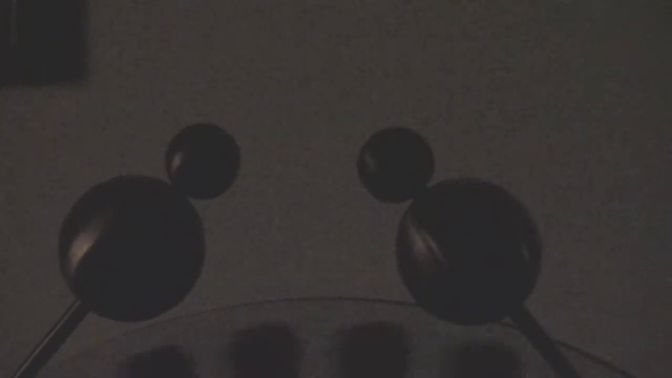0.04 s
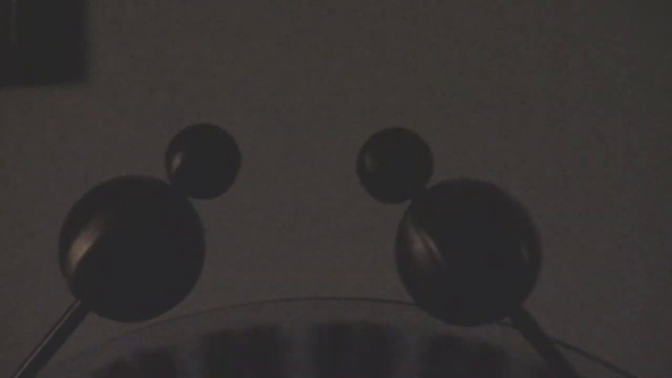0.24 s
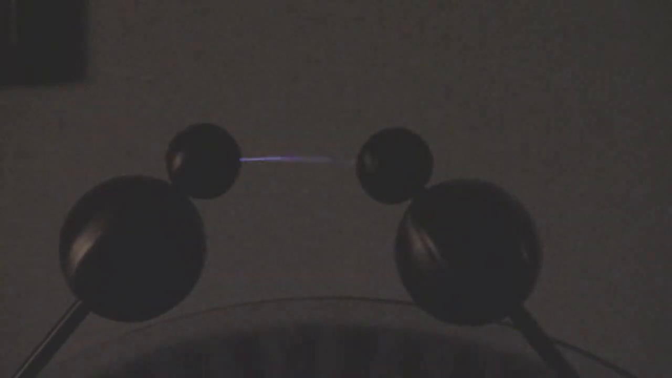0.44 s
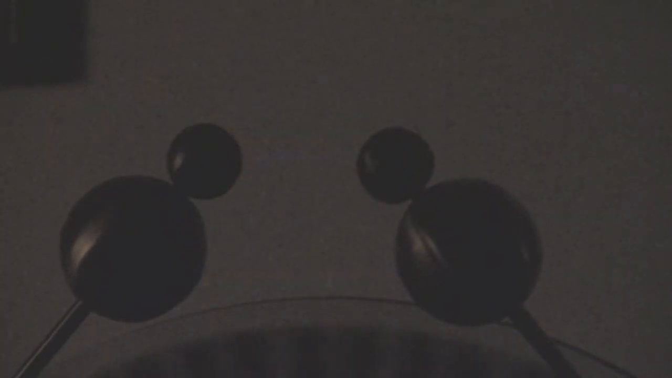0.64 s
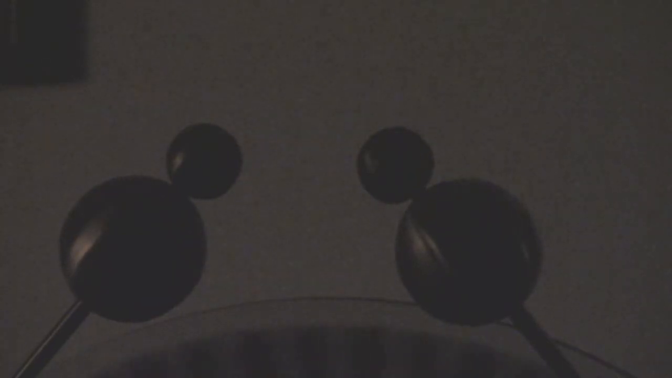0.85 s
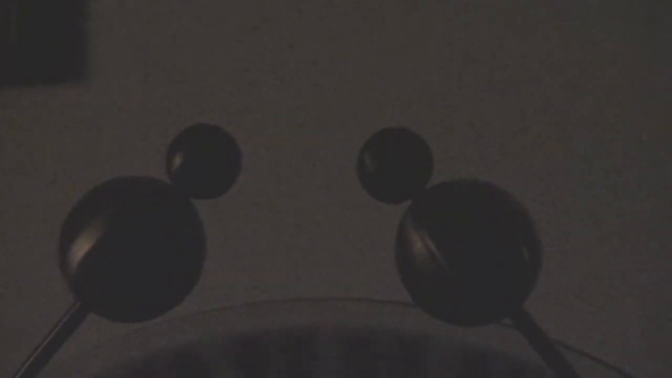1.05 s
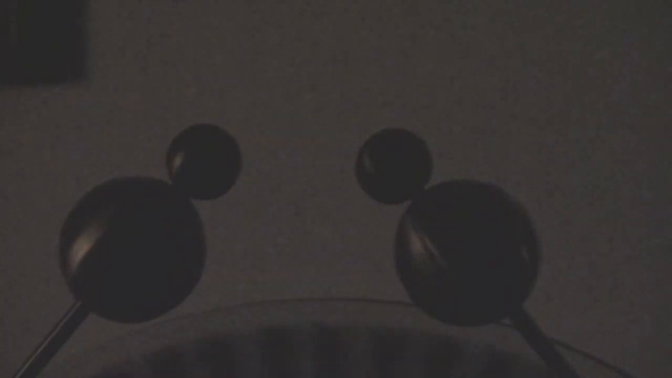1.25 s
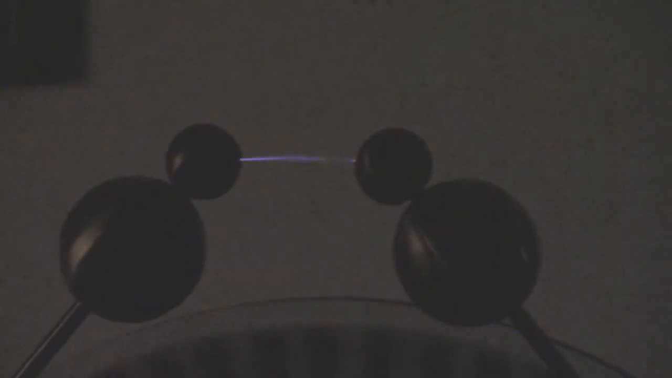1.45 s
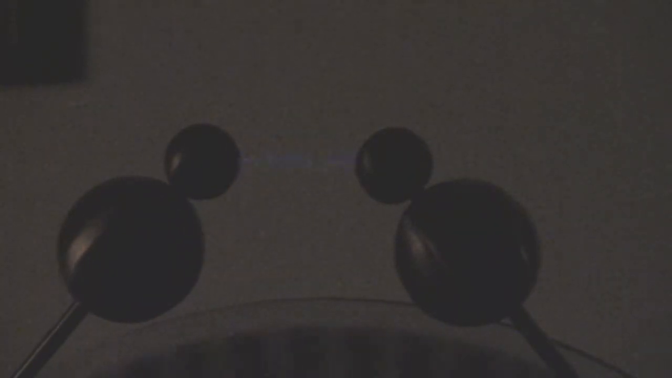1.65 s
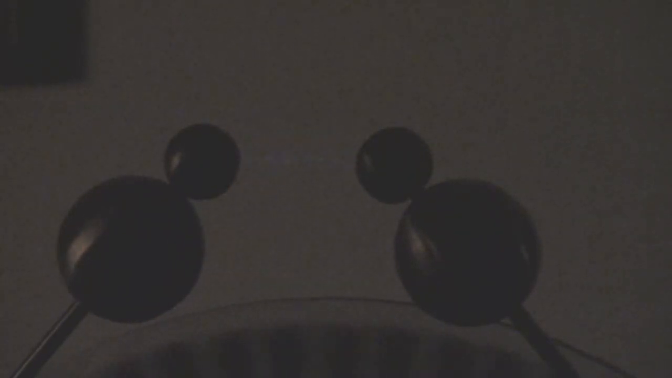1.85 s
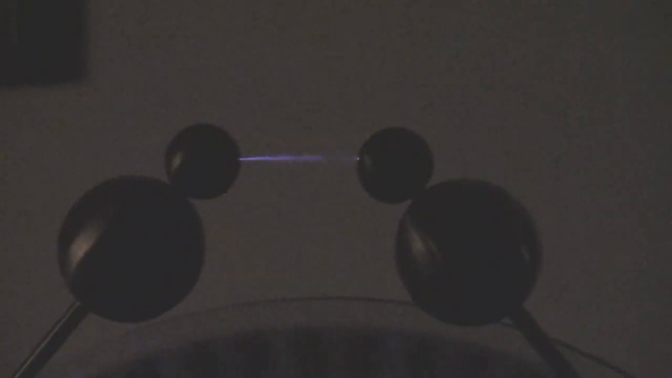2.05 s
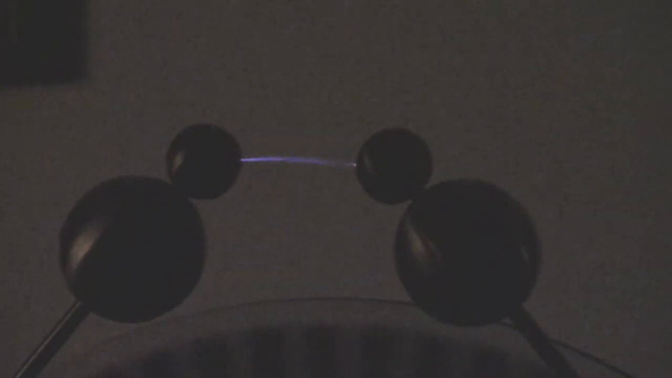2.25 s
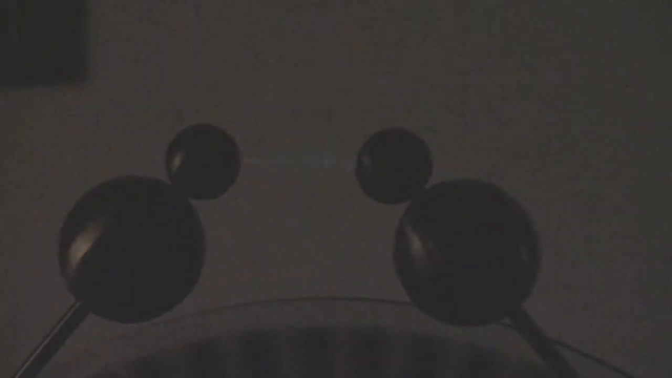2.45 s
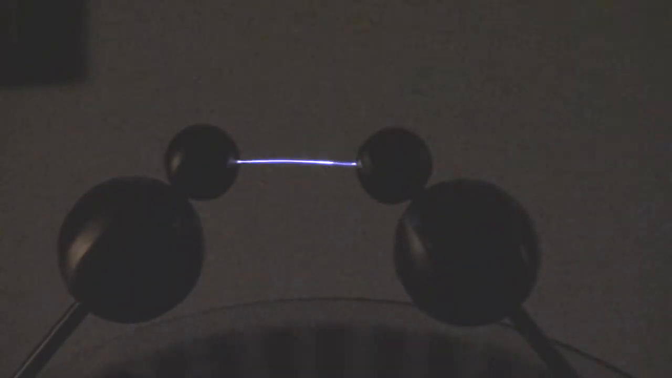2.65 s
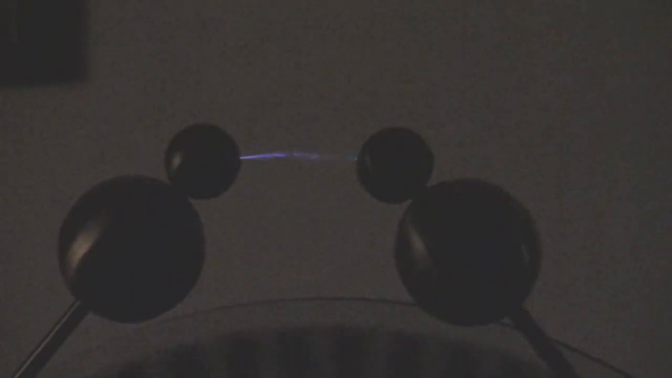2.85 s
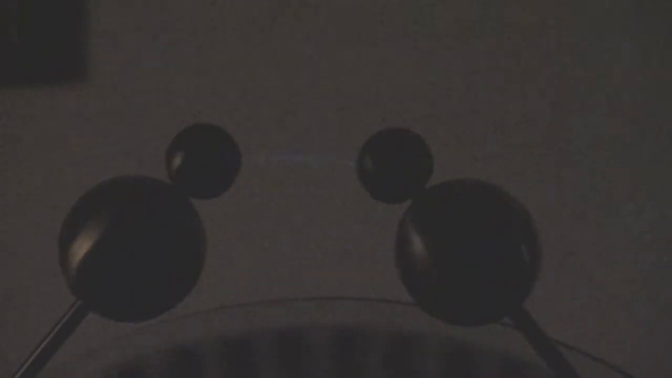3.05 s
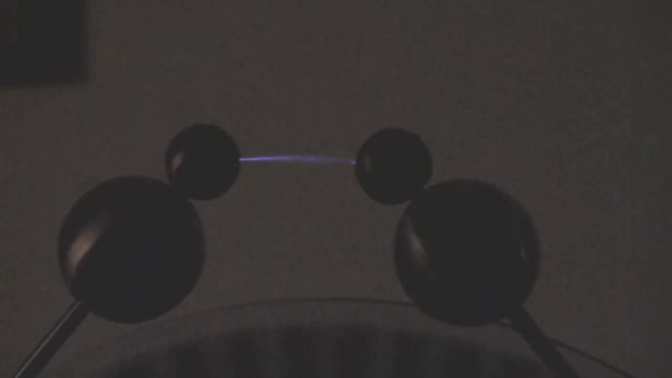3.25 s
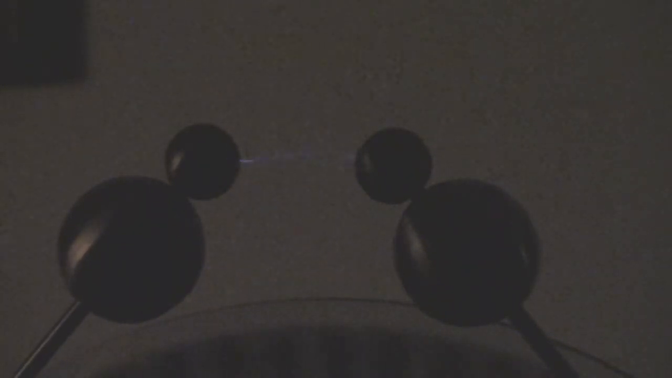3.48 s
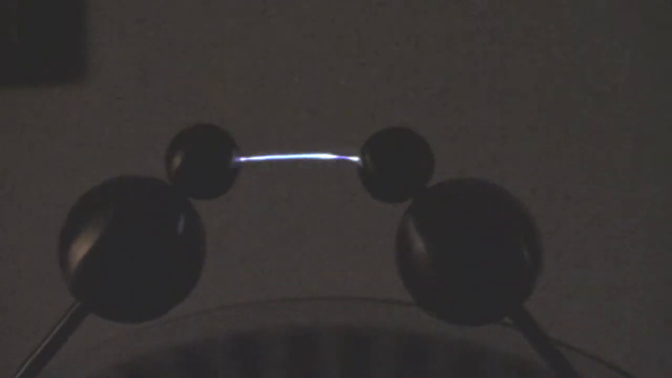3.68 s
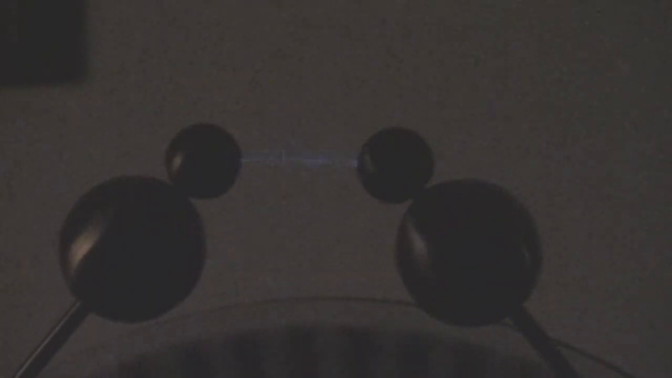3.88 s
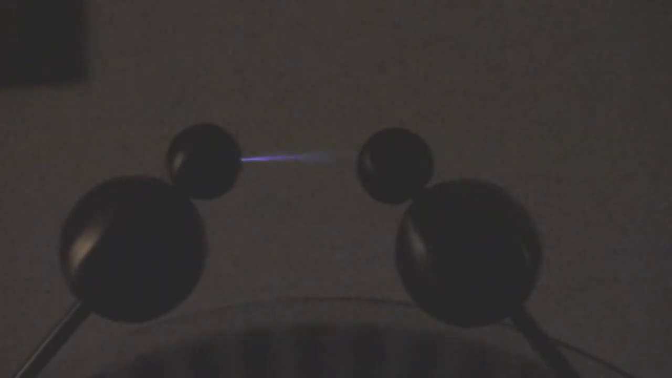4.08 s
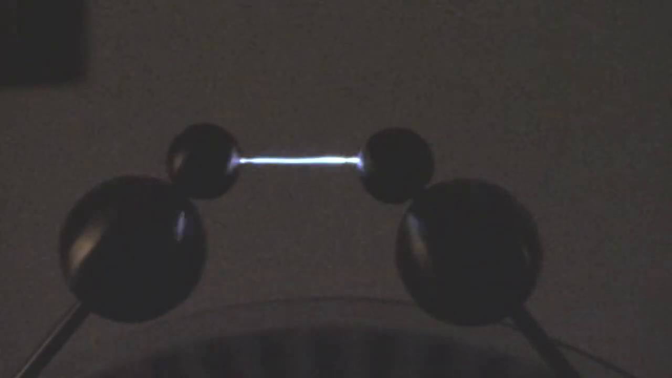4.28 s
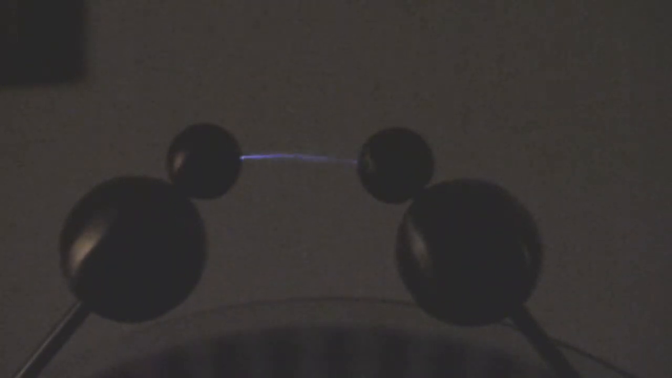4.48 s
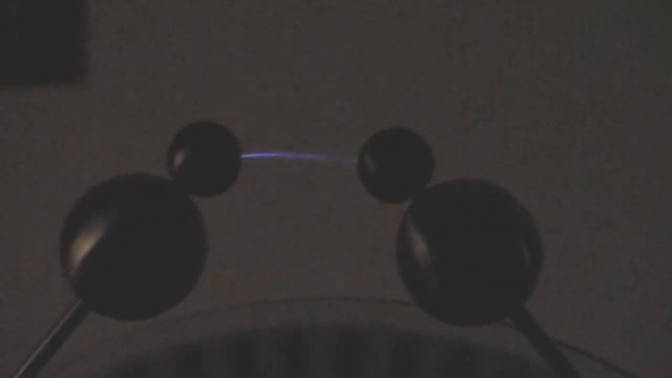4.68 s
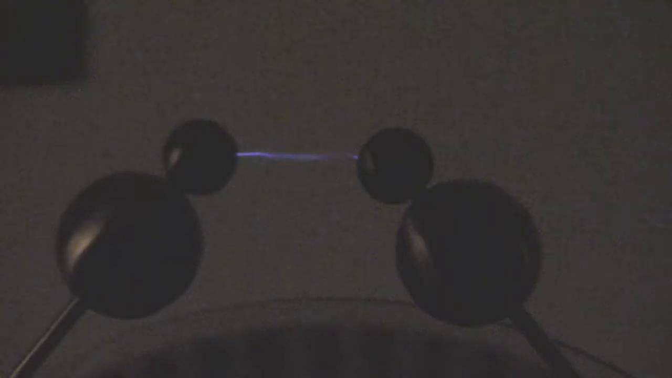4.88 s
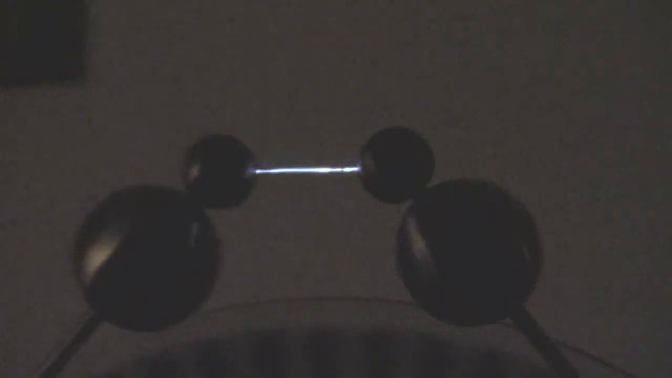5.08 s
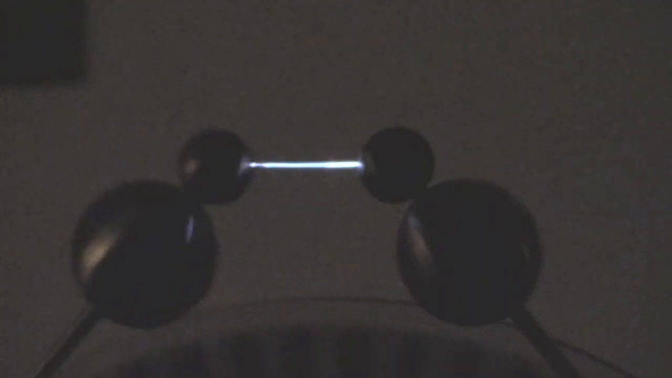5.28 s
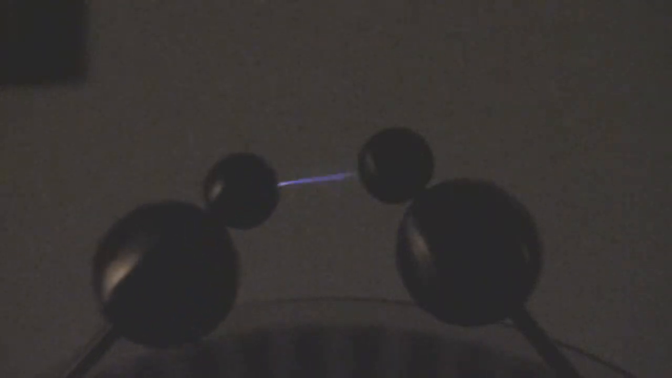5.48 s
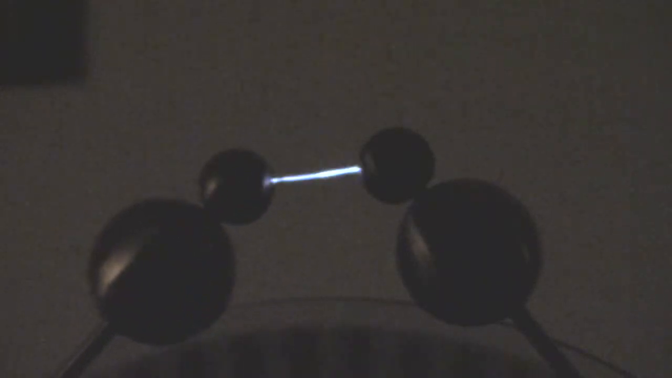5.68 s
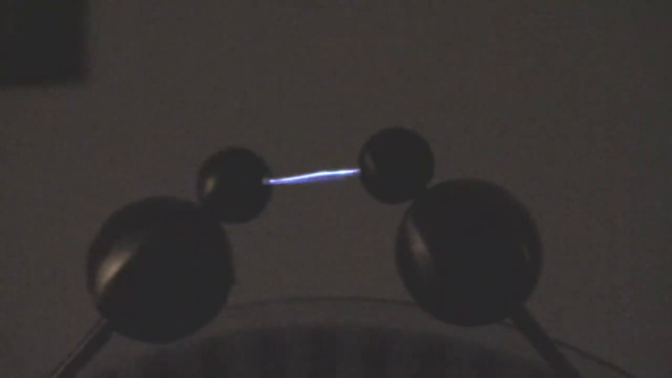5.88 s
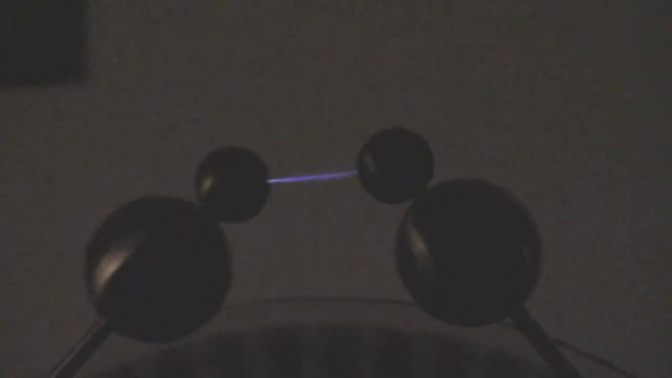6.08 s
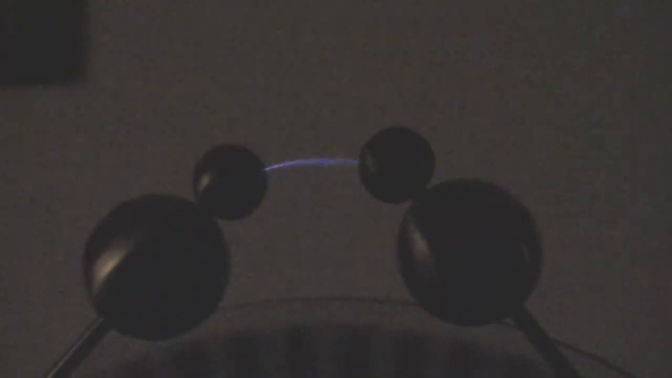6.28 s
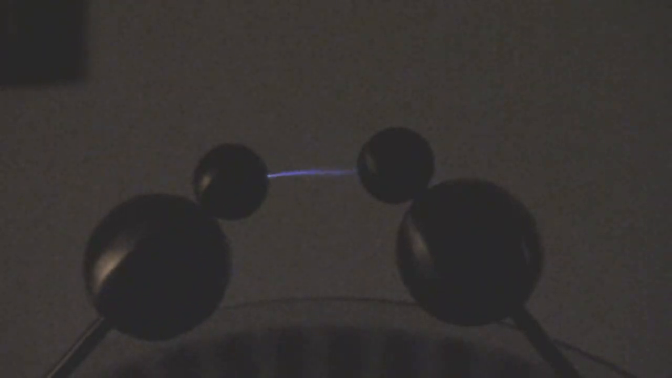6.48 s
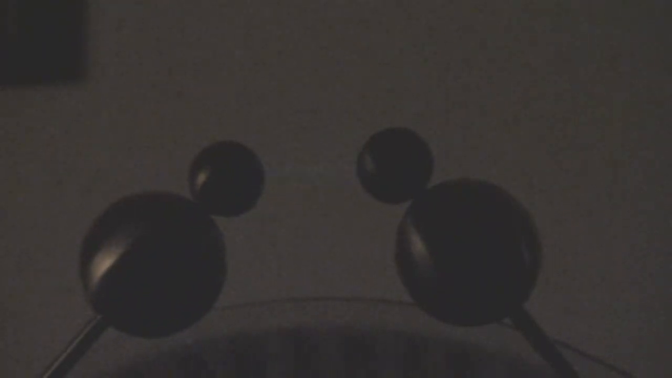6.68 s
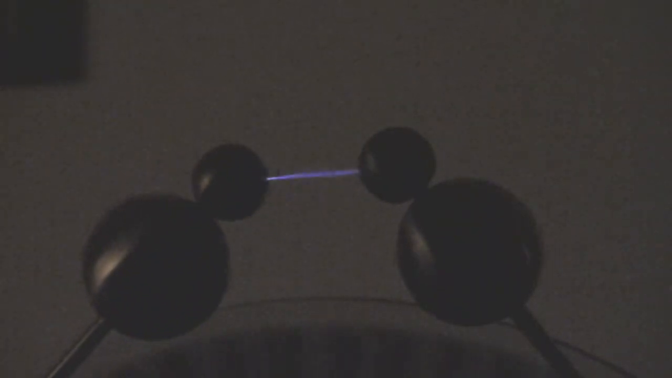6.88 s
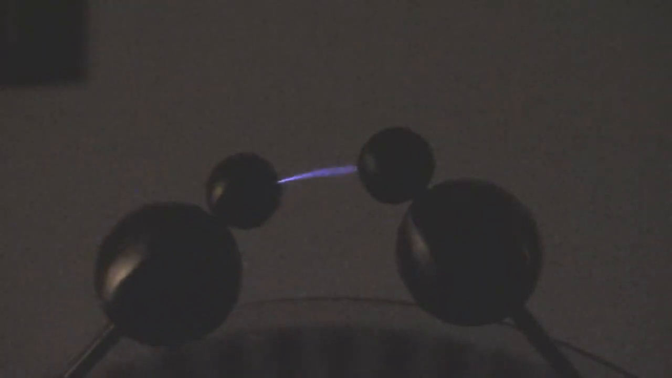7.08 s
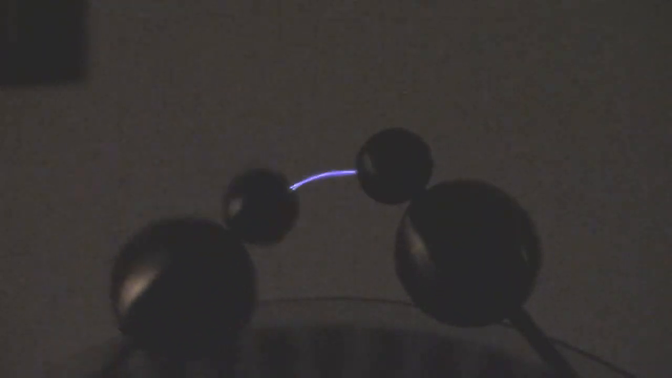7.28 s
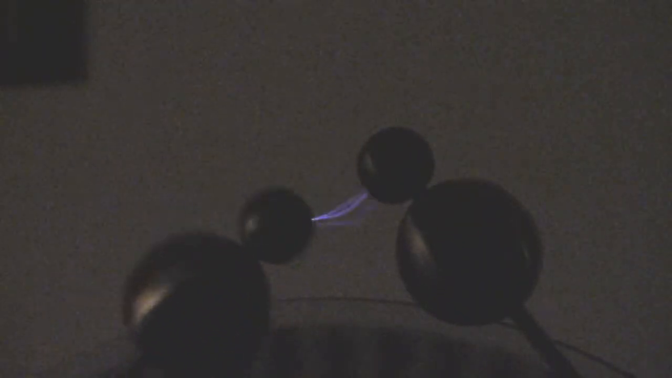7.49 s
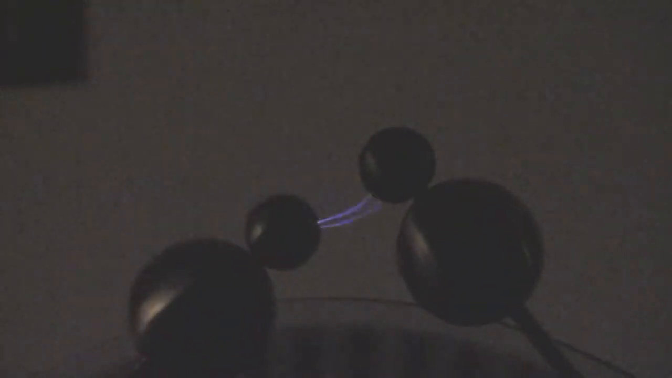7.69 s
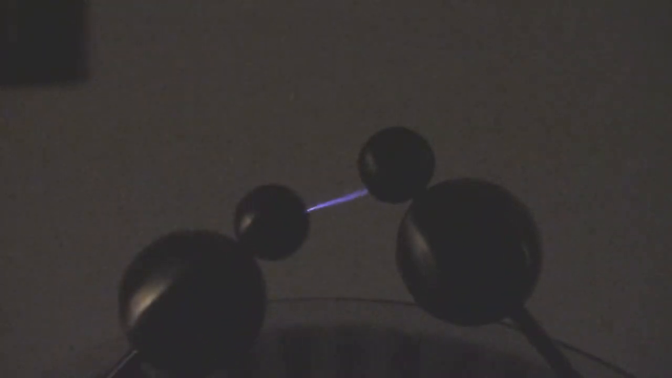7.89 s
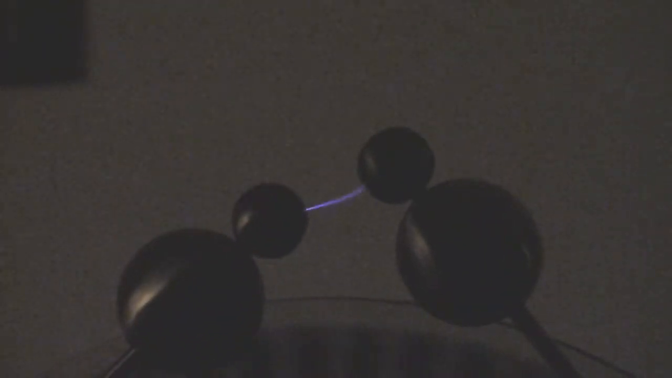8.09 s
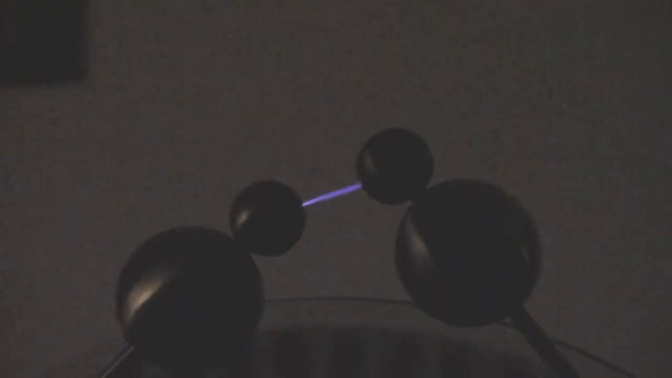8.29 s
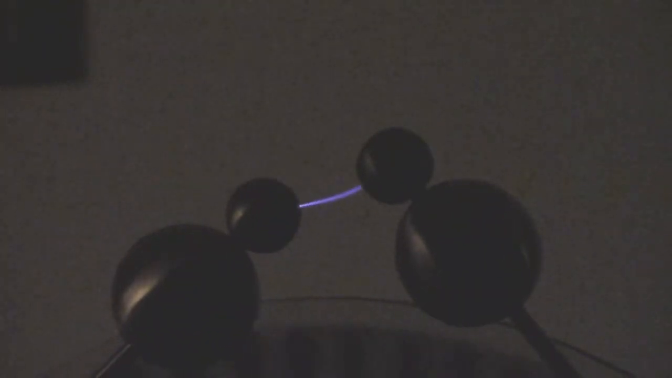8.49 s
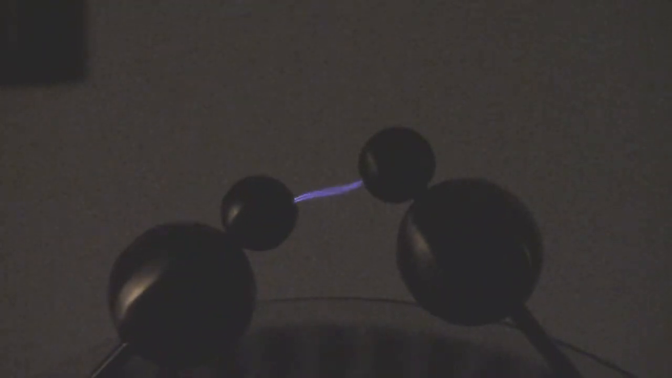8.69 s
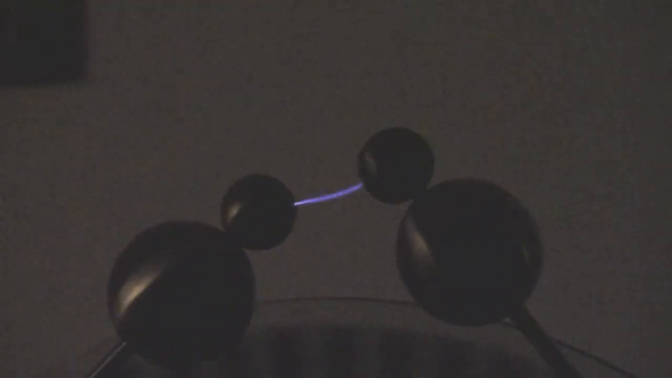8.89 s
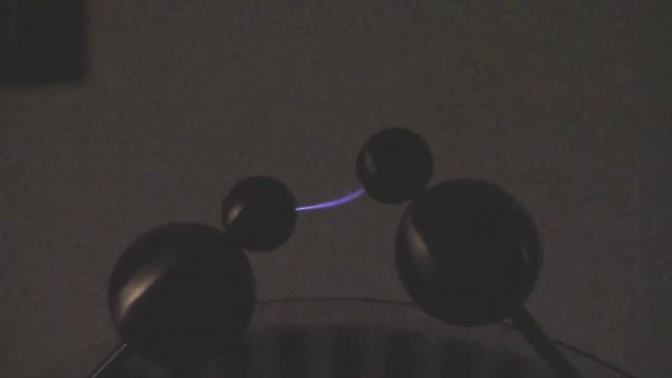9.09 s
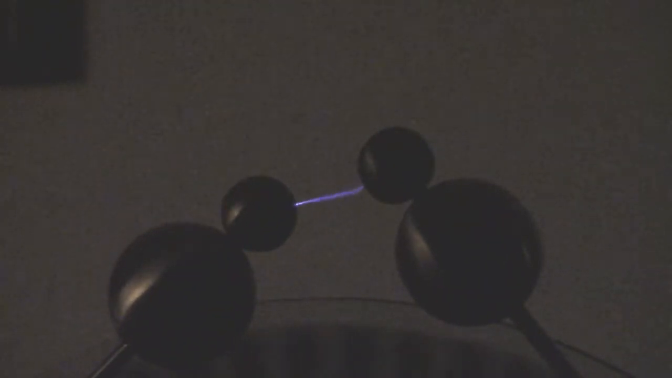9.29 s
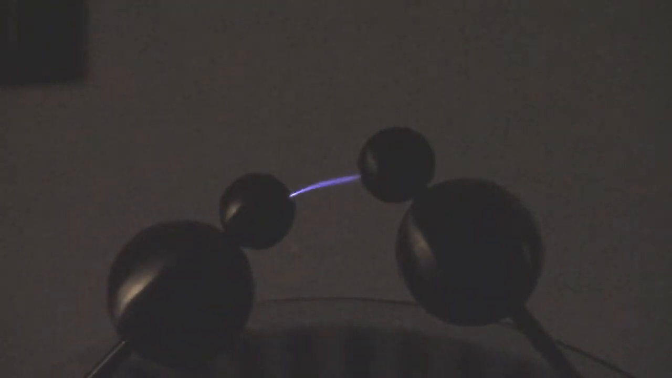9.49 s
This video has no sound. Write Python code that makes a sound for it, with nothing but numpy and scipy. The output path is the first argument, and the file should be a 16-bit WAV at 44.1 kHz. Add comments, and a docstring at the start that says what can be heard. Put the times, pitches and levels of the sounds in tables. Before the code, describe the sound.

Close, overloaded electric snaps in a small indoor space: about six per second at first, soon over twenty, then thirty to forty with uneven loud cracks and tiny gaps. Near the end the gap narrows and the snaps blur into a rough, slightly quieter buzzing crackle at around sixty per second. Bright close reflections and short room ringing follow each spark, over very faint hum and tiny ticks.

```python
"""In a small room, an electrostatic machine sparks between two metal balls close to the microphone.
The gap recharges faster as the discs speed up, and a hard spark delays the next one.
The snaps merge into a crackle when one ball is pushed nearer.
Each snap is a filtered click that overloads the microphone, bounces off nearby surfaces and dies in
the room; faint ticks of leaking charge, low hum lines and filtered noise lie underneath."""
import sys
import numpy as np
from scipy import signal
from scipy.io import wavfile

SR = 44100
rng = np.random.default_rng(int(sys.argv[2]) if len(sys.argv) > 2 else 0)


def persist_wave(psi):
    """Save psi, clipped to +-1, as 16-bit WAV."""
    counts = np.round(np.clip(psi, -1, 1) * 32767).astype(np.int16)
    wavfile.write(sys.argv[1], SR, np.atleast_2d(counts).T)


N = 420713

# The moment the left ball is pushed close, in seconds.
GAP_NARROWS_S = 7.365
# Spectrum of one spark's shock wave. Each row: frequency in Hz, relative level in dB.
SNAP_SPECTRUM = [(60, -22), (200, -18), (500, -10), (1000, -7), (2000, -1), (3200, 1), (5000, 3.5),
                 (6700, 5.5), (9000, 5.5), (11000, 5), (13500, 4.5), (15500, -1)]
# Crisp reflections from the balls and discs.
# Each row: delay in ms, gain in dB with the gap wide, gain in dB with the gap narrow.
BALL_ECHOES = [(1.691, -7.5, -19), (2.026, -8.5, -29), (2.27, -25, -23), (2.634, -0.5, 0.5),
               (2.81, -19, -28)]
# Scattered reflections from things around the machine, before their colouring.
# Each row: delay in ms, gain in dB with the gap wide, gain in dB with the gap narrow.
SCATTERED_ECHOES = [(5.92, -5, -4), (6.12, -5, -9), (8.59, -8, -8), (9.80, -18, -7.5), (10.61, -13, -32),
                    (12.07, -12, -27), (12.78, -15, -14), (13.27, -6, -6)]


def amp(db):
    """Decibels to gain."""
    return 10 ** (np.asarray(db) / 20)


def evened(x):
    """Scales to rms 1."""
    return x / np.sqrt(np.mean(x ** 2) + 1e-20)


def read(points, hz):
    """Joins (Hz, value) points on a log-frequency axis."""
    f, value = np.transpose(points)
    return np.interp(np.log(hz + 1), np.log(f + 1), value)


def colour(x, points, size=2048):
    """Causal (minimum-phase) filter with the given spectrum: nothing sounds before a click."""
    hz = abs(np.fft.fftfreq(size, 1 / SR))
    log_gain = np.log(amp(read(points, hz)))
    taps = np.fft.ifft(np.exp(np.conj(signal.hilbert(log_gain)))).real
    return signal.oaconvolve(x, taps[:size // 2])[:len(x)]


def clicks(s, sizes, count=N):
    """A train of impulses, each a windowed sinc at its exact time between samples."""
    place = np.asarray(s)[:, None] * SR
    at = np.floor(place).astype(int) + np.arange(-7, 9)
    shape = np.sinc(at - place) * np.sinc((at - place) / 8)
    weights = shape * np.asarray(sizes)[:, None]
    inside = np.clip(at, 0, count).ravel()
    return np.bincount(inside, weights.ravel(), count + 1)[:count]


def background(waver=0.23, lean_db=0.17):
    """Slightly wavering hum lines in soft room noise, nearly the same in both channels."""
    # Hum lines, each wavering slightly; the two near 120 Hz also beat.
    # Each row: frequency in Hz, rms in dB before the wavering and the final low cut.
    hum_lines = [(59.2, -53), (118.4, -56), (124.3, -62.5), (172.3, -58), (457.6, -58), (812.9, -60),
                 (1574, -62)]
    # Spectrum of the room noise. Each row: frequency in Hz, relative density in dB per Hz.
    air_spectrum = [(20, -10), (80, -15), (130, -10.5), (220, -5.5), (300, -1.5), (440, 1), (620, -2.5),
                    (850, -12.5), (1300, -14), (2000, -20.5), (3500, -26.5), (8000, -32), (15000, -41)]
    # Stereo spread of the noise. Each row: frequency in Hz, side minus mid in dB.
    air_spread = [(60, -17), (400, -25), (1200, -21), (2800, -28), (6000, -11), (14000, -26)]
    air_db = -45.5
    t = np.arange(N) / SR
    knots = np.linspace(0, t[-1], 40)
    hum = 0
    for hz, db in hum_lines:
        swell = 1 + waver * np.interp(t, knots, rng.standard_normal(len(knots)))
        tone = np.sin(2 * np.pi * (hz * t + rng.random()))
        hum = hum + np.sqrt(2) * amp(db) * swell * tone
    noises = rng.standard_normal((2, N))
    mid, side = (amp(air_db) * evened(colour(noise, air_spectrum)) for noise in noises)
    side = colour(side, air_spread)
    return (hum + np.array([mid + side, mid - side])) * amp([[lean_db], [-lean_db]])


def corona(level_db=-54, per_s=30, spread_db=4):
    """Charge leaks off the discs and combs in faint random ticks, coloured like the snaps."""
    sizes = amp(level_db + spread_db * rng.standard_normal(N))
    ticks = sizes * (rng.random(N) < per_s / SR)
    return colour(ticks, SNAP_SPECTRUM)


def discharges(count=600):
    """The gap charges and breaks down over and over; ordinary sparks fill the time between the hard ones.
    Returns the columns s, strength dB, thump dB and the angle of each spark's crooked path."""
    # The first snaps, heard one by one while the discs gather speed. Each entry: time in seconds.
    opening_s = [0.3172, 0.4932, 0.65, 0.7928, 0.9159, 1.1786, 1.2582, 1.33, 1.4081, 1.4707, 1.5352, 1.6016]
    # Hard sparks that drain the machine and knock the microphone.
    # Each row: time in seconds, relative strength in dB, relative thump in dB.
    hard_sparks = [(1.0284, 5, -9), (1.6613, 5, -7), (2.4454, 5.5, -17), (2.5064, 5.5, -12),
                   (2.691, 4.5, -24), (2.8188, 5.5, -5), (2.91, 5.5, -16), (2.9669, 5.5, -10),
                   (3.0578, 5.5, -4), (3.555, 5.5, -14), (3.7305, 6, -3), (3.8894, 6, -13), (3.9971, 6, -1),
                   (4.3231, 6.5, -7), (4.433, 6.5, -6.5), (4.5435, 5, 3.5), (4.808, 6, -9),
                   (5.0759, 5, -20), (5.119, 4.5, -10), (5.1611, 4.5, -24), (5.209, 5, -14),
                   (5.2606, 5.5, -24), (5.3102, 5, -10), (5.389, 3.5, -6), (5.4325, 3.5, -24),
                   (5.5531, 2, -24), (5.5911, 3, -19), (5.6334, 4, -10), (5.7049, 3.5, -4),
                   (5.7475, 3, -10), (5.936, 2, -5.5), (6.0045, 2, -6), (6.1786, 3.5, -7),
                   (6.2453, 2.5, -8), (6.284, 3, -24), (6.353, 3, -15), (6.4153, 3, -6), (6.4538, 3.5, -24),
                   (6.543, 3.5, -15), (6.6288, 4, -12), (6.6645, 4, -15), (6.701, 3.5, -8),
                   (6.7924, 3.5, -5), (6.9434, 4, -1.5), (7.0187, 2.5, -1.5), (7.2175, 2, -13),
                   (7.2487, 2, -24)]
    # How fast the gap recharges, set by the speed of the discs and the width of the gap.
    # Each row: time in seconds, sparks per second.
    recharge = [(0.4, 5.9), (1.66, 17), (2.05, 21.5), (2.28, 22.4), (2.42, 25.5), (2.6, 24.5), (2.8, 28.5),
                (3.2, 28.3), (3.4, 31), (4.5, 31.7), (5.3, 32), (5.5, 37), (6.4, 41.6), (6.9, 44.2),
                (7.25, 51.4), (7.4, 53), (7.47, 62.27), (7.8, 61), (7.88, 54), (8.02, 65), (8.12, 57.5),
                (8.8, 56), (9.05, 47.42), (9.17, 54.3), (9.54, 44.92)]
    # The charge leaks away and the sparking falters. Each row: start in seconds, length in seconds.
    stalls = [(3.42, 0.019), (3.5, 0.032), (3.82, 0.019), (5.0, 0.031), (5.76, 0.021)]
    # Strength of the ordinary sparks. Each row: time in seconds, relative level in dB.
    strength = [(0.3, -0.8), (2.4, 0.1), (3.4, 1.2), (5.0, 1.1), (5.5, -0.9), (6.9, -0.7), (7.33, -2),
                (7.47, -5), (8.0, -3.5), (8.7, -3), (9.5, -1.8)]
    drain_share = 0.55  # extra charge needed after a hard spark, as a share of one ordinary recharge
    wide_jitter, narrow_jitter = 0.02, 0.055  # spread of the breakdown, as a share of a recharge
    wide_spread_db, narrow_spread_db = 0.5, 1.0  # chance in strength from spark to spark
    soft_thump_db, soft_thump_spread_db = -28, 3  # thump of an ordinary spark

    t = np.arange(N) / SR
    flow = np.interp(t, *np.transpose(recharge))
    for start, length in stalls:
        flow = flow * ((t < start) | (t > start + length))
    charge = np.cumsum(flow) / SR  # counted in ordinary recharges

    marks = [(np.interp(s, t, charge), 0) for s in opening_s]
    marks += [(np.interp(row[0], t, charge), drain_share) for row in hard_sparks]
    marks.sort()
    due = []
    for (level, drain), (following, _) in zip(marks, marks[1:]):
        steps = max(round(following - level - drain), 1)
        due.extend(np.linspace(level + drain, following, steps + 1)[1:-1])
    due.extend(np.arange(sum(marks[-1]) + 1, charge[-1]))

    late, strong, heavy, angle = rng.standard_normal((count, 4)).T
    is_narrow = np.interp(due, charge, t) > GAP_NARROWS_S
    jitter = np.where(is_narrow, narrow_jitter, wide_jitter)
    s = np.r_[opening_s, np.interp(due + jitter * late[:len(due)], charge, t)]
    spread_db = np.where(s > GAP_NARROWS_S, narrow_spread_db, wide_spread_db)
    strength_db = np.interp(s, *np.transpose(strength)) + spread_db * strong[:len(s)]
    thump_db = soft_thump_db + soft_thump_spread_db * heavy[:len(s)]
    rows = np.r_[hard_sparks, np.c_[s, strength_db, thump_db]]
    return (*rows.T, 2 * np.pi * angle[:len(rows)])


def shocks(train, share, body_growth=0.87, crack_growth=0.81, split_hz=4500):
    """Shock waves; a stronger spark makes a longer wave, so its body grows faster than its crack."""
    s, strength_db, _, _ = train
    lows = signal.butter(1, split_hz, fs=SR)
    body = clicks(s, share * amp(body_growth * strength_db))
    crack = clicks(s, share * amp(crack_growth * strength_db))
    # The body sounds below the split, the crack above it.
    both = crack + signal.lfilter(*lows, body - crack)
    return -colour(both, SNAP_SPECTRUM)


def sparks(train, direct_db=1, lean_db=-0.9, flutter_db=-21):
    """The direct snaps, nearly centred, and their reflections before and after the gap is narrowed."""
    # What the microphone adds to sound that arrives head-on. Each row: frequency in Hz, gain in dB.
    head_on = [(300, -7.5), (2000, 4.5), (3800, 3.5), (5200, 0.5), (6100, 1), (7300, 7), (9000, 6.5),
               (10300, 7), (12500, -1), (14200, 3.5), (15500, -4)]
    # How the shorter spark across the narrow gap differs. Each row: frequency in Hz, gain in dB.
    short_spark = [(250, 1), (700, -2), (1600, -1.5), (2600, -0.5), (7500, 0), (10000, 2), (12000, 0),
                   (13800, 0.5), (15000, 2)]
    narrow = 1. * (train[0] > GAP_NARROWS_S)
    wide = 1 - narrow
    _, near_wide_db, near_narrow_db = np.transpose(BALL_ECHOES)
    _, far_wide_db, far_narrow_db = np.transpose(SCATTERED_ECHOES)
    direct = amp([[direct_db + lean_db], [direct_db - lean_db]])

    wide_early = echoes(near_wide_db, far_wide_db) + amp(flutter_db) * flutter()
    snaps = direct * colour(shocks(train, wide), head_on)
    snaps += reflections(train, wide, wide_early, ring_db=1)

    narrow_early = echoes(near_narrow_db, far_narrow_db)
    crackle = direct * colour(shocks(train, narrow), head_on)
    crackle += reflections(train, narrow, narrow_early, ring_db=-7)
    return snaps + np.array([colour(channel, short_spark) for channel in crackle])


def echoes(near_db, far_db, smear=0.014):
    """The first reflections: near ones are single taps, far ones are smeared more the longer their way."""
    # Small rounded things throw back treble unevenly. Each row: frequency in Hz, gain in dB.
    scatter_colour = [(500, 3.5), (2000, -12), (4000, 1.5), (6500, -6), (9000, 4.5), (11500, -3.5),
                      (15000, 4)]
    t = np.arange(1024) / SR
    near_s = np.array(BALL_ECHOES)[:, 0] / 1000
    far_s = np.array(SCATTERED_ECHOES)[:, 0] / 1000
    near = clicks(near_s, amp(near_db), count=len(t))
    far = np.zeros(len(t))
    for delay, db in zip(far_s, far_db):
        burst = rng.standard_normal(len(t)) * np.exp(-abs(t - delay) / (smear * delay))
        far += amp(db) * burst / np.linalg.norm(burst)
    return near + colour(far, scatter_colour)


def flutter(delay_s=0.0143, spread_s=0.00059, centre_hz=6600):
    """A cluster of close echoes that merge into one short, pitched ping."""
    t = np.arange(1024) / SR - delay_s
    return np.cos(2 * np.pi * centre_hz * t) * np.exp(-(t / spread_s) ** 2)


def reflections(train, share, early, ring_db, wander=0.38):
    """The room's answer for one setting of the balls; each crooked spark path changes part of the tail."""
    # Colour of the difference between the channels in the tail.
    # Each row: frequency in Hz, side minus mid in dB.
    tail_spread = [(300, -14), (900, -20.5), (1800, -53), (2800, -52), (4500, -23), (6500, -17.5),
                   (9000, -16.5), (12000, -19), (15000, -44)]
    snaps = shocks(train, share)
    path = train[-1]
    late = np.sqrt(1 - wander ** 2) * signal.oaconvolve(snaps, tail())[:N]
    late += amp(ring_db) * signal.oaconvolve(snaps, rings())[:N]
    for bend in (np.cos(path), np.sin(path)):
        late += wander * signal.oaconvolve(shocks(train, share * bend), tail())[:N]
    mid = signal.oaconvolve(snaps, early)[:N] + late
    side_tail = colour(tail(build_s=0.00033), tail_spread)
    side = signal.oaconvolve(snaps, side_tail)[:N]
    return np.array([mid + side, mid - side])


def tail(build_s=0.007):
    """One random room response: scattering builds up, then each band dies at its own speed."""
    # Each row: frequency in Hz, time to fall by 60 dB in seconds, relative level in dB.
    room_bands = [(150, 0.24, -10.5), (500, 0.61, -21), (1490, 0.41, -20.5), (3980, 0.41, -22.5),
                  (6640, 0.36, -23.5), (9800, 0.27, -24), (11800, .24, -26), (15400, 0.2, -27.5)]
    room = np.array(room_bands)
    hz, t, z = signal.stft(rng.standard_normal(SR // 2), SR, nperseg=256)
    level_db = read(room[:, [0, 2]], hz)[:, None]
    t60 = read(room[:, :2], hz)[:, None]
    ring = signal.istft(z * amp(level_db - 60 * t / t60), SR, nperseg=256)[1]
    return ring * (1 - np.exp(-np.arange(len(ring)) / SR / build_s))


def rings(t60=0.27):
    """Narrow resonances of the machine and its surroundings, which every snap sets ringing."""
    # Each row: frequency in Hz, relative peak gain in dB.
    ring_modes = [(1040, 3), (1510, 11), (1800, 11), (2250, 10), (2340, 14.5), (2995, 5), (3100, 12.5),
                  (3605, 10), (3967, 14), (4227, 4), (4908, 11.5), (5410, 10), (6481, 0)]
    t = np.arange(SR // 4) / SR
    decay = np.log(1000) / t60
    modes = sum(amp(db) * np.cos(2 * np.pi * (hz * t + rng.random())) for hz, db in ring_modes)
    return 2 * decay / SR * modes * np.exp(-decay * t)


def thumps(train, level_db=-14, usual_db=-14.5, push_s=0.00081, drain_hz=230):
    """After each overload the microphone swings back in one short push and settles; hard sparks push more."""
    s, _, thump_db, _ = train
    overloads = clicks(s, amp(usual_db) + amp(thump_db))
    t = np.arange(256) / SR
    push = np.sin(np.pi * np.minimum(t / push_s, 1))  # one half sine, then rest
    knocks = amp(level_db) * signal.oaconvolve(overloads, push)[:N]
    return signal.lfilter(*signal.butter(1, drain_hz, "high", fs=SR), knocks)


def scene():
    """Sparks, their thumps, leaking charge and the room."""
    train = discharges()
    return sparks(train) + thumps(train) + corona() + background()


def record(dry, ceiling=0.85, low_cut_hz=95, edge_hz=15830):
    """The microphone squashes peaks towards its ceiling; then come the low cut and the band limit."""
    clipped = dry / (1 + (dry / ceiling) ** 8) ** (1 / 8)
    thinned = signal.lfilter(*signal.butter(2, low_cut_hz, "high", fs=SR), clipped)
    band = signal.firwin(1023, edge_hz, window=("kaiser", 8), fs=SR)
    return signal.oaconvolve(thinned, band[None], "same", axes=1)


dry = scene()
out = record(dry)
persist_wave(out)
```